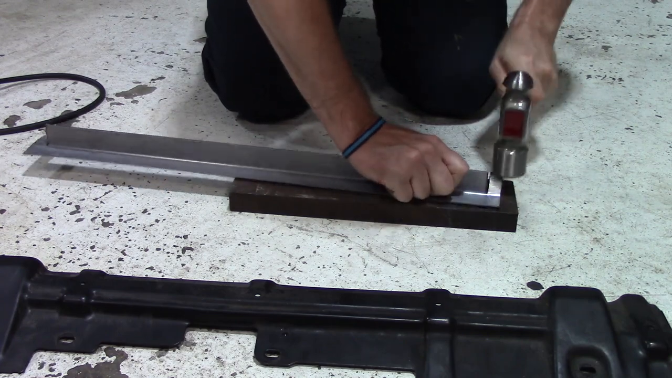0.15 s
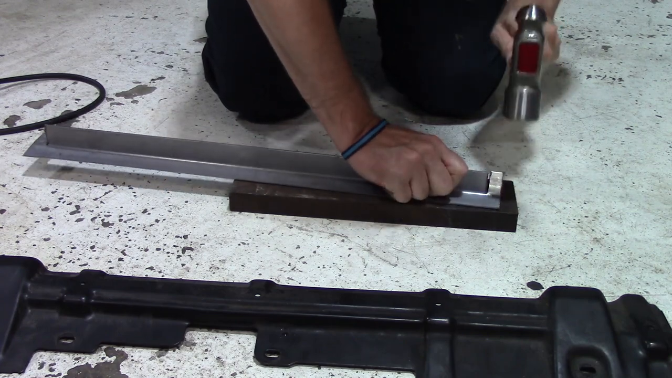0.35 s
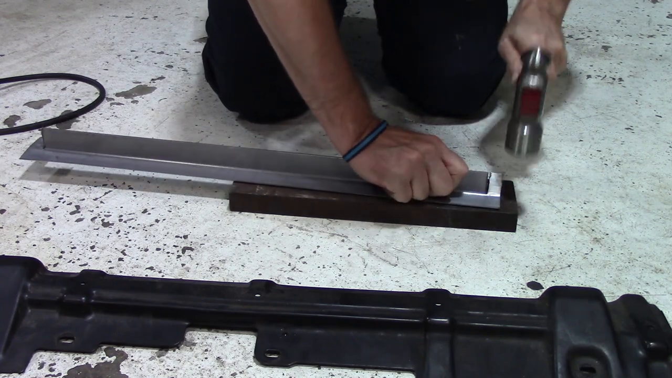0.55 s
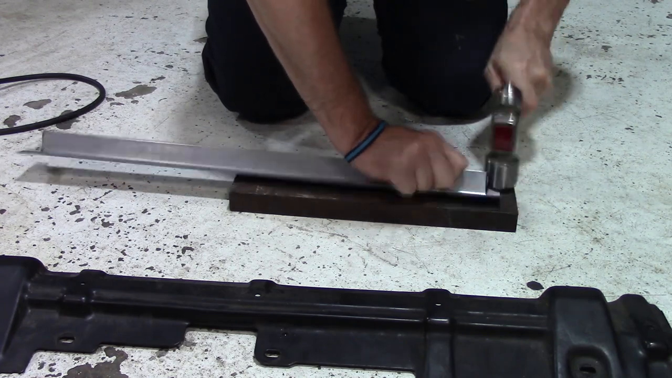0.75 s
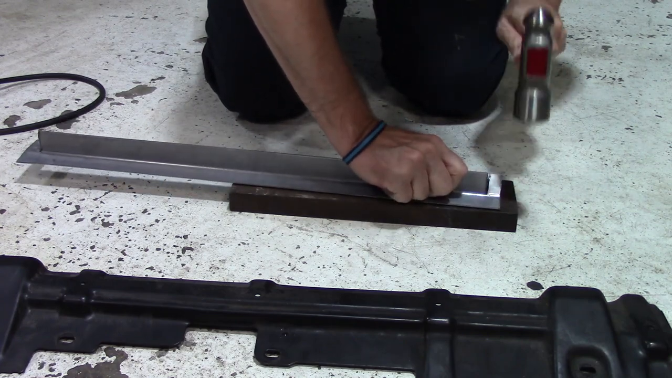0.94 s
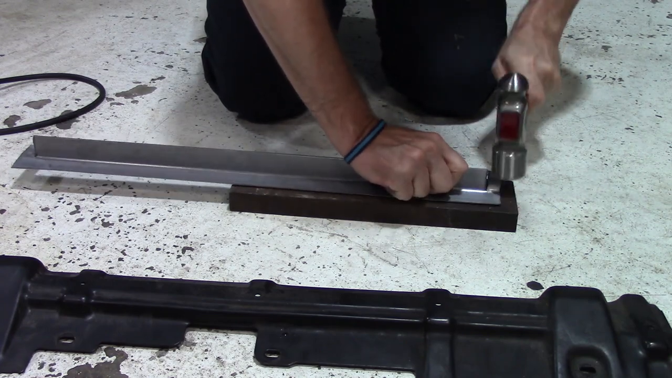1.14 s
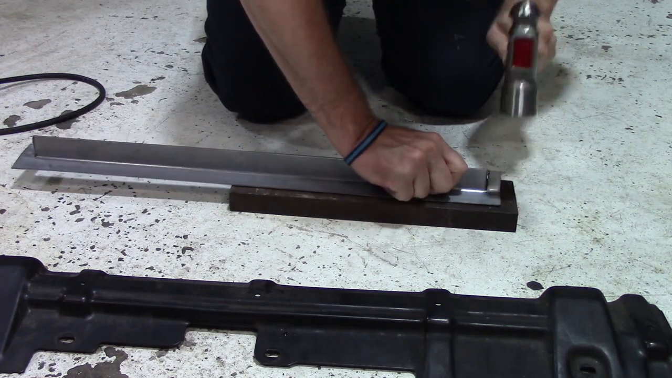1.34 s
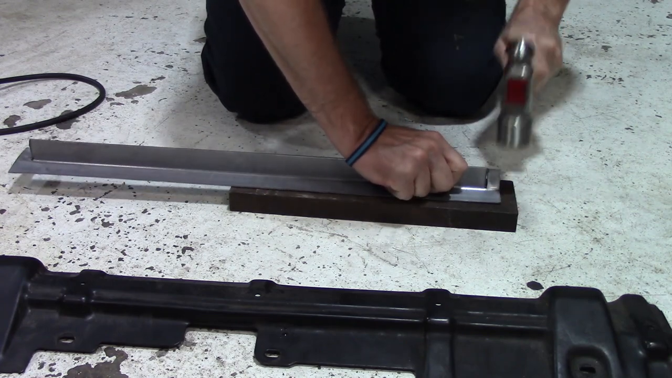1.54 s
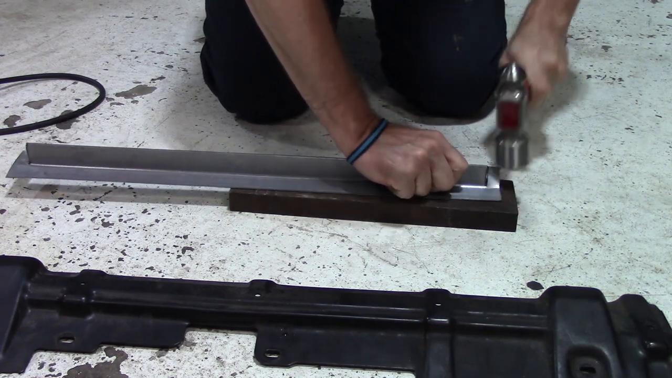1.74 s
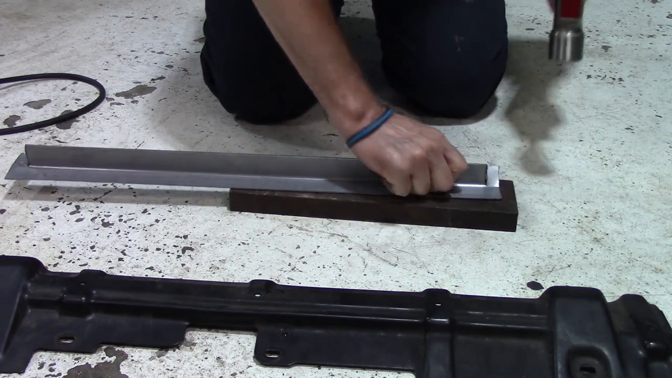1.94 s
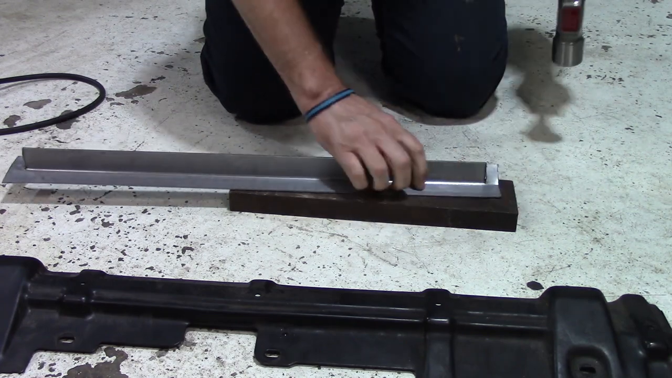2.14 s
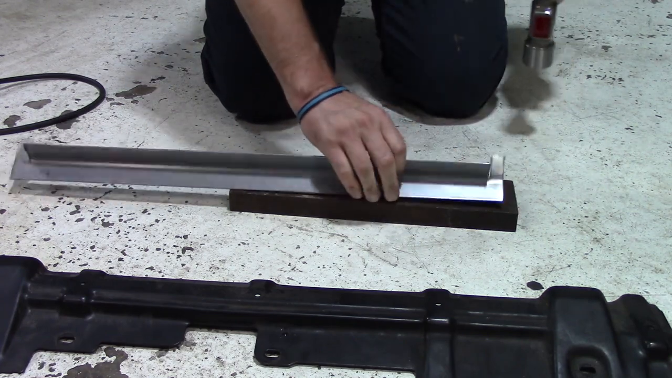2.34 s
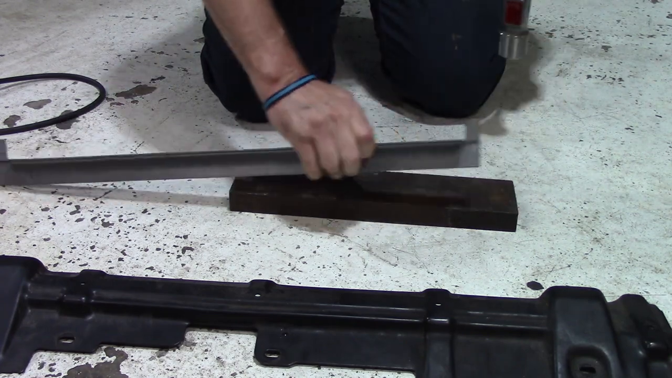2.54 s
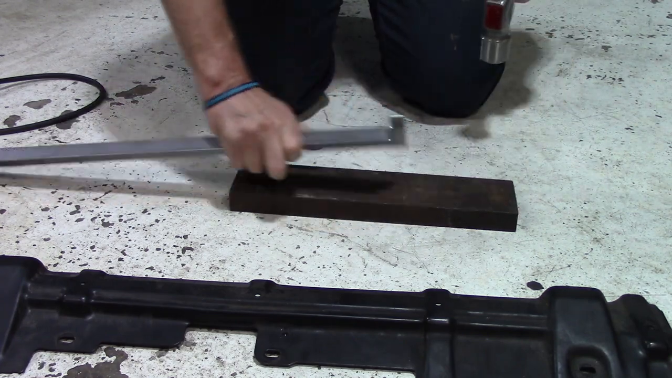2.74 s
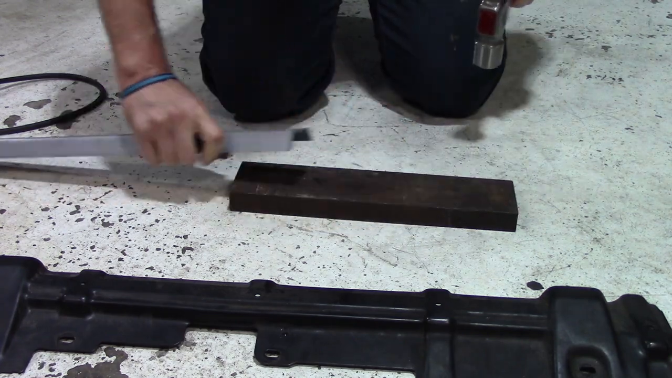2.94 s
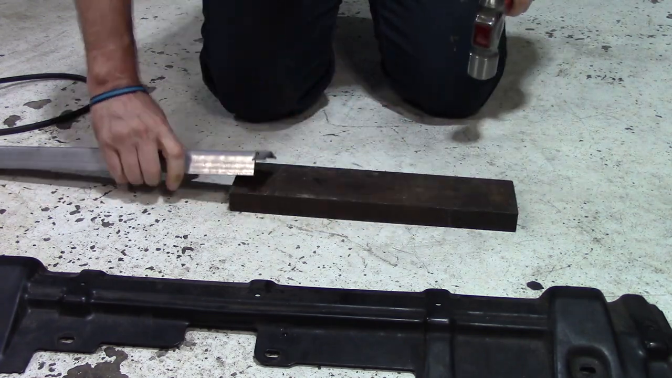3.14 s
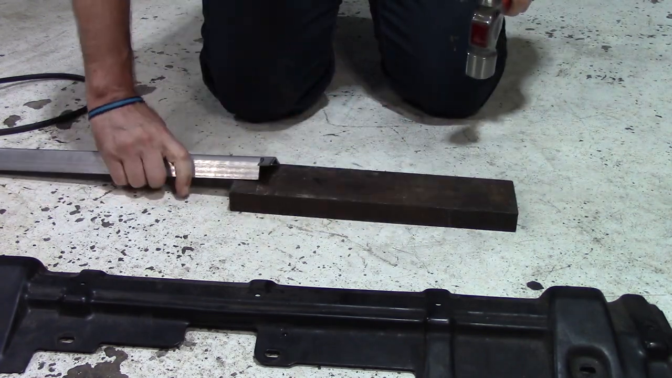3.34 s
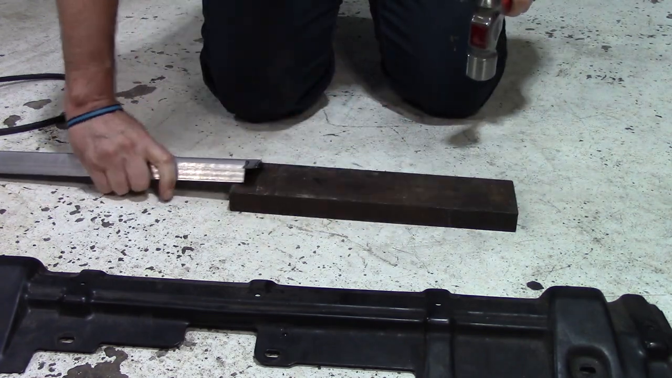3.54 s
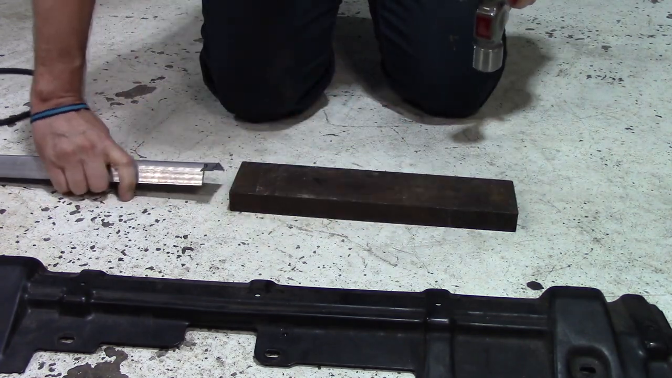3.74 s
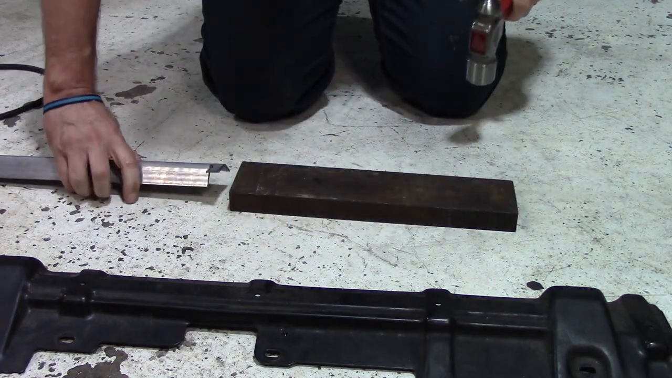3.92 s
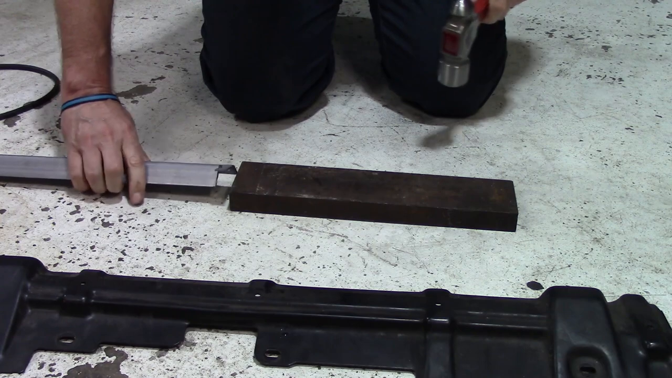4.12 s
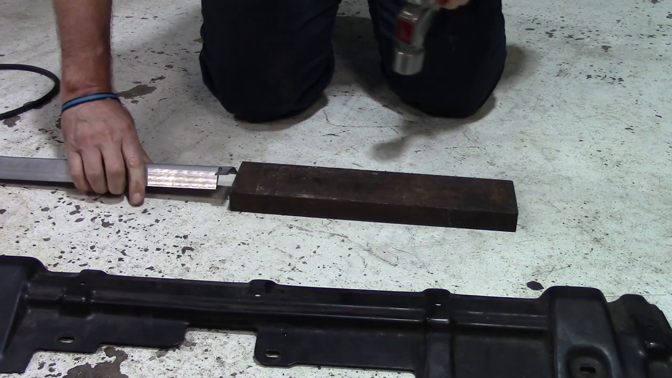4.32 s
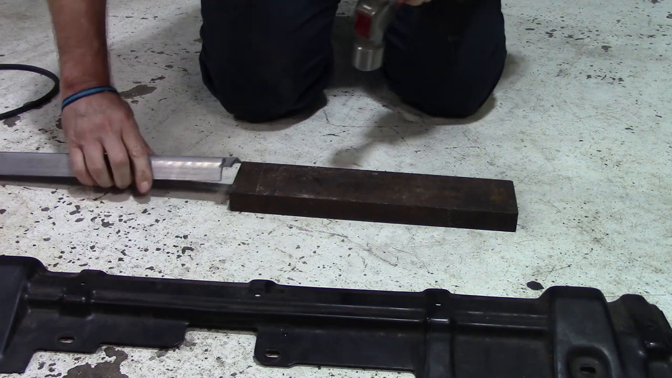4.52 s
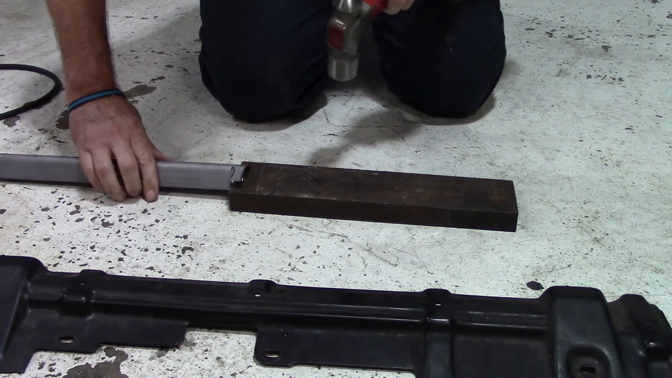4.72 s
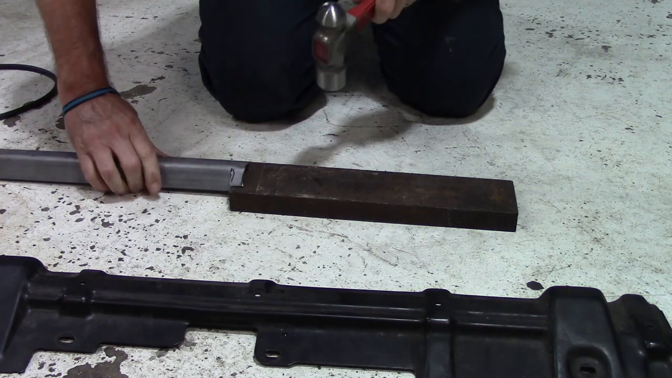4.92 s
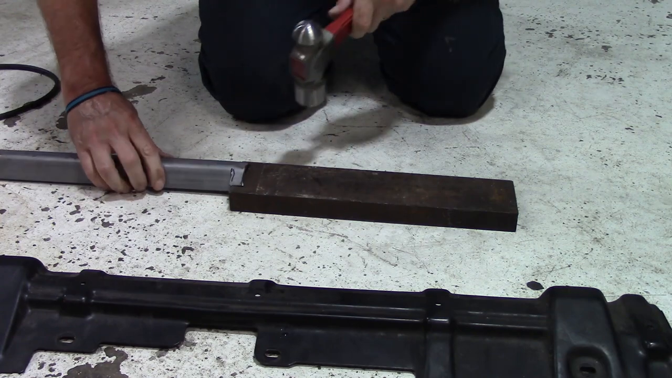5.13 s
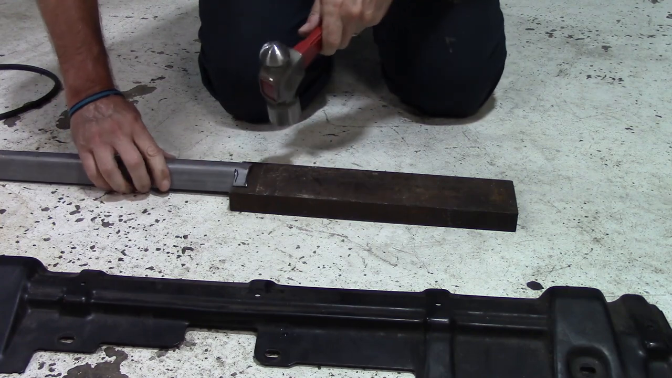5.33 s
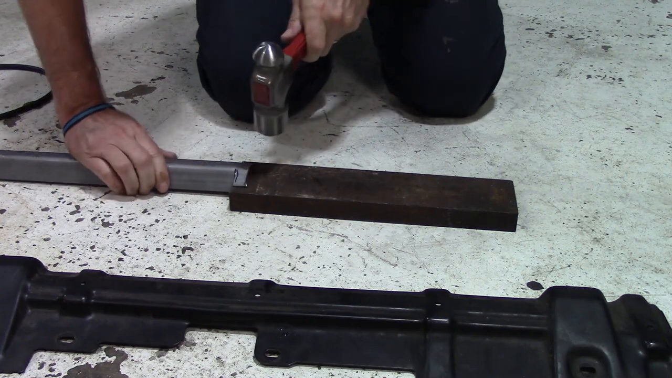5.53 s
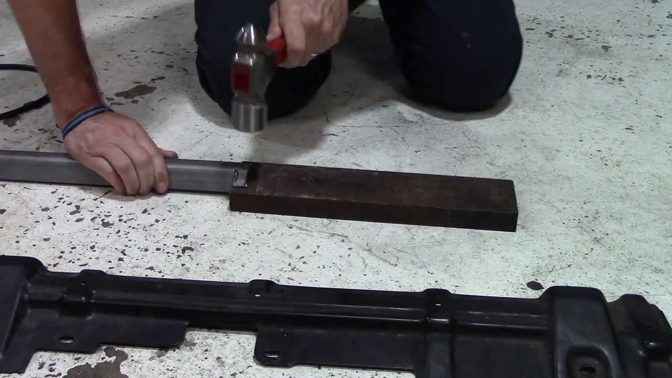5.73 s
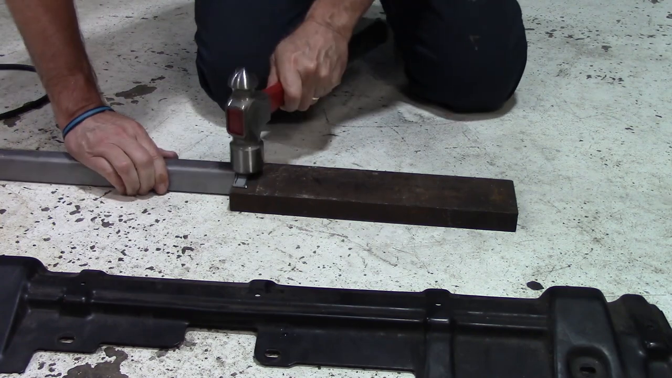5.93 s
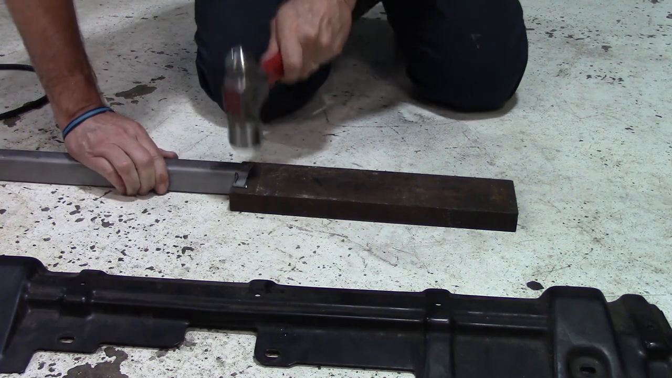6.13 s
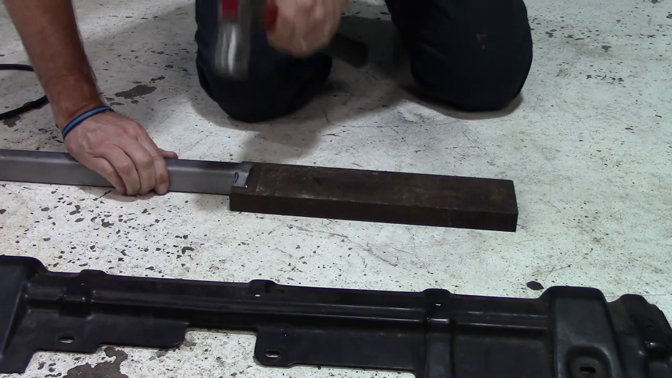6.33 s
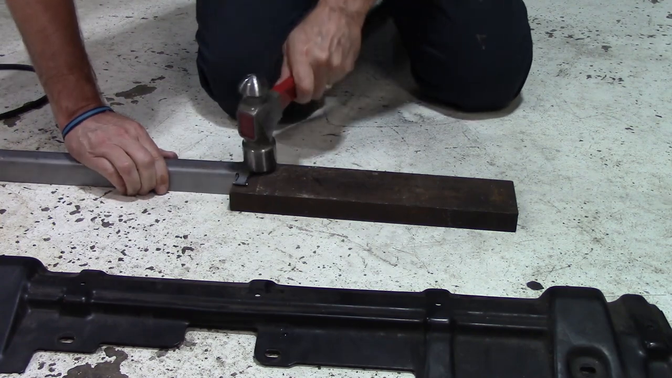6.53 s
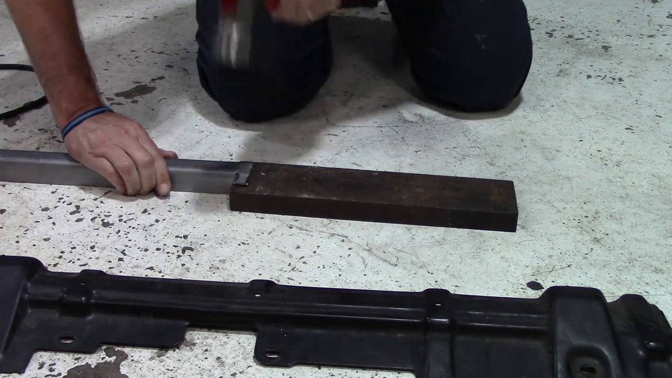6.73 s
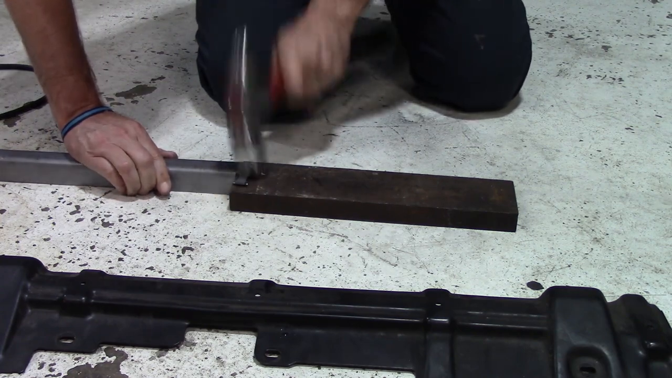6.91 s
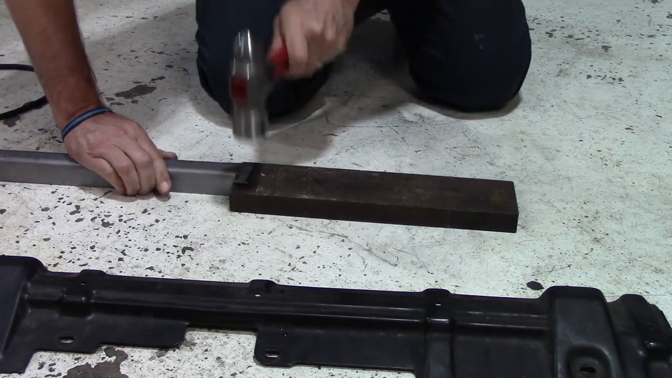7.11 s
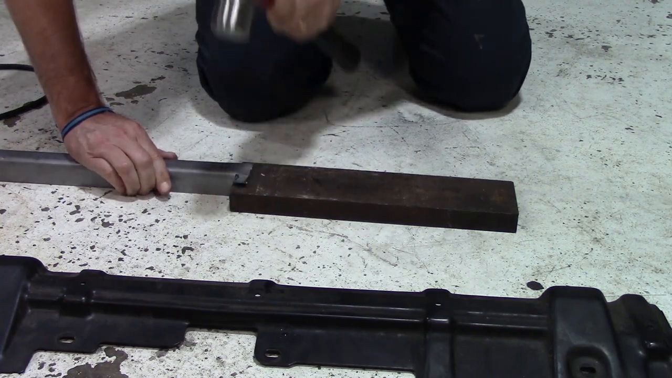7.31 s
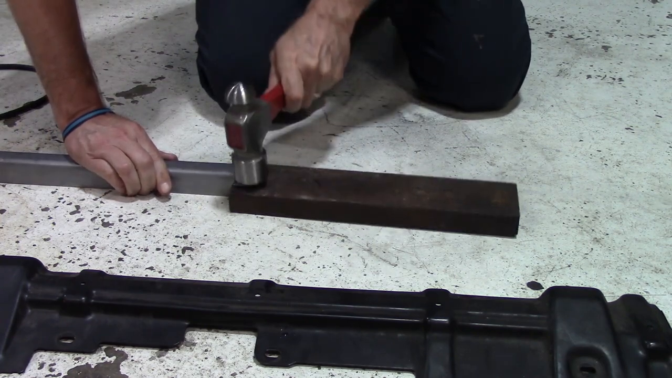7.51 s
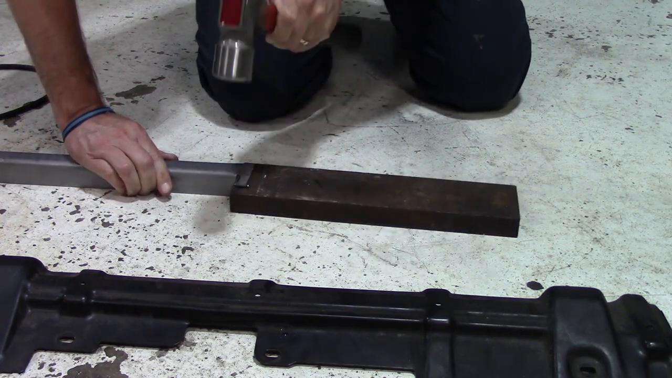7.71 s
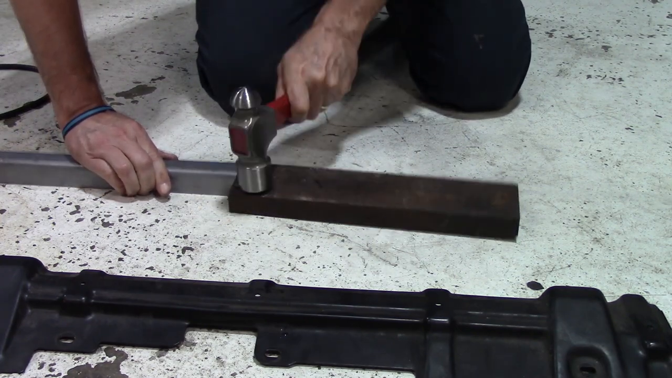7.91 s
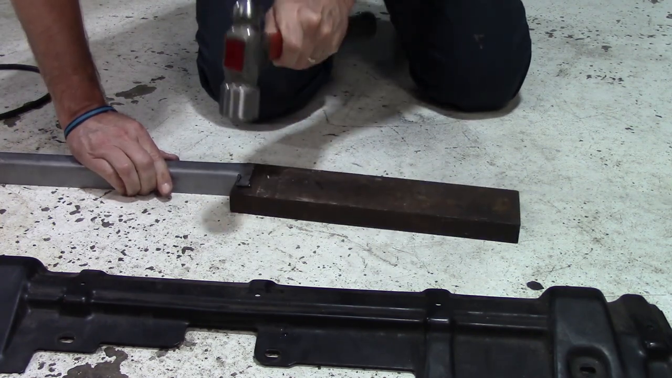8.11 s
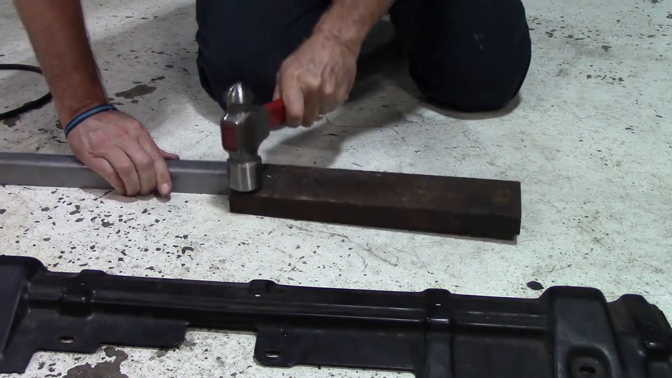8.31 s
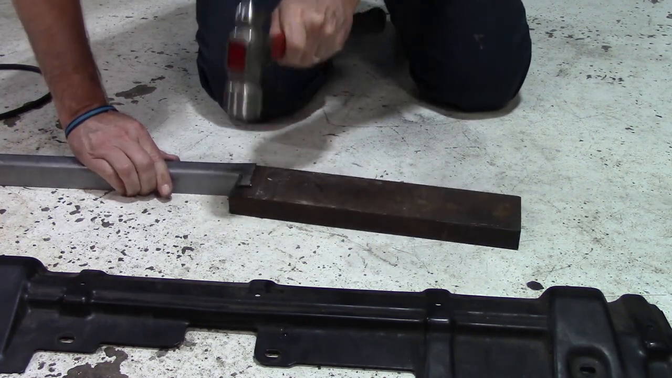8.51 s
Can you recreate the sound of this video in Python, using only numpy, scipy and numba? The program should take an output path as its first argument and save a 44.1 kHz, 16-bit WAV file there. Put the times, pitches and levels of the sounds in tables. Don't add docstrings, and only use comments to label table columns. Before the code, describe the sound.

In an echoing garage, a hammer cracks six times on thin metal, the piece scrapes and clinks over, then six heavy clangs flatten it.

```python
import sys
import numpy as np
from scipy import signal
from scipy.fft import rfft, irfft
from scipy.io import wavfile
from scipy.ndimage import uniform_filter1d
from numba import njit

SR = 44100
rng = np.random.default_rng(int(sys.argv[2]) if len(sys.argv) > 2 else 0)


def magnitude_from_level(level_db):
    exponent = np.asarray(level_db, float) / 20
    return 10 ** exponent


def file_out(sig):
    cols = np.atleast_2d(sig).T
    lim = np.clip(cols, -1, 1)
    pcm = np.round(lim * 32767).astype(np.int16)
    wavfile.write(sys.argv[1], SR, pcm)


N = 381906

# (time [s], strength [dB], tilt [dB/octave], struck spot [Hz], second spot [Hz])
BENDS = [(0.1783, -4.5, 6.5, 5630, 8580), (0.495, -4.5, 4.5, 3900, 11660), (.817, -3, 0.5, 2874, 6110),
         (1.1472, -2.5, 3, 4940, 8900), (1.479, -2.5, 3.5, 6000, 11270), (1.746, -3, 2, 8880, 12200),
         (1.758, 2, 0, 2170, 2870), (1.777, -5.5, 5, 870, 3180), (1.168, -8.5, -2, 3500, 7850),
         (1.492, -4.5, -1, 749, 3235), (1.499, -6, -2.5, 2300, 7270)]
# (frequency [Hz], level [dB])
BEND_COLOUR = [(24, -73.5), (40, -40.5), (219, -13.5), (261, -9), (400, -9.5), (1120, -11.5), (1510, -12.5),
               (1990, -10), (3530, -12.5), (6600, -21), (7480, -20.5), (15900, -25)]
# (frequency [Hz], width [Hz], level [dB])
TAB = [(410, 120, 1.7), (7400, 240, 4.9)]
BEND_SPOT = 72, 5
WALL_HZ, FOLDED_HZ, FOLDED_S = 1475, 1545, 1.05
WALL_WIDTH_HZ, WALL_DB, FOLDED_DB = 45, 13, 3.5
# (time [s], length [ms], level [dB])
FLUTTERS = [
    (0.1759, 8, -14),
    (0.4946, 2.9, -10),
    (0.816, 32, -18.5),
    (1.16, 14.7, -9),
    (1.481, 5, -7.5),
    (1.488, 6.4, -11.5),
    (1.501, 11, -10.5),
    (1.761, 20, -12.5),
]
# (time [s], length [ms], pitch [Hz], level [dB])
SLAPS = [(0.188, 13.4, 410, -10.5), (0.504, 9, 457, -8.5), (1.158, 4.8, 437, 2), (1.492, 9.1, 690, -13.5),
         (4.722, 15, 1250, -27.5), (5.304, 45, 1850, -35.5), (5.325, 39, 1606, -31),
         (5.707, 26, 333, -28.5), (5.726, 18, 476, -32.5), (5.739, 22, 403, -34), (5.76, 26, 310, -32.5),
         (5.786, 14, 450, -36)]
SKID_HZ, SKID_END_HZ, SKID_MS, SKID_DB = 9860, 7650, 1.5, 3.5
SKID_ECHO = 0.085

# (time [s], strength [dB], crack length [ms], tilt [dB/octave], struck spot [Hz])
FLATS = [(5.996, 16.5, 1.2, 6, 8780), (6.0007, 13, 4.7, 0.5, 1742), (6.466, 22, 4.17, 0, 788),
         (6.994, 21.5, 3.47, -1.5, 440), (7.466, 5.5, 3.3, -3, 2520), (7.919, 5, 4.4, -1.5, 1217),
         (8.347, 5.5, 3.3, -1, 1252), (7.133, -5.5, 2.2, 2, 1810), (7.571, 2, 2.0, -2, 2900),
         (7.635, -27.5, 2.7, 7, 7000), (8.008, -7.5, 2.4, -0.5, 1805), (8.437, -11, 4, -1.5, 1730),
         (8.493, -17, 5.1, 0, 1810), (7.582, -11, 3.9, -1, 7520), (7.489, -1, 4, -1.5, 7400),
         (8.021, -10.5, 4, -1.5, 2100)]
# (frequency [Hz], level [dB])
FLAT_COLOUR = [(24, -58), (40, -36), (255, -8), (400, -15), (767, -6), (1010, -11.5), (2140, -2),
               (2310, -2), (4420, -10), (7670, -6), (11200, -7.5), (15900, -18.5)]
# (frequency [Hz], width [Hz], level [dB])
PINCH = [(440, 110, -6.5), (2100, 30, -6.5)]
# (frequency [Hz], width [Hz], level [dB])
LOOSE = [(1335, 730, 8), (7000, 660, -2.5)]
FLAT_SPOT, FLAT_S = (18, 0.67), 6.8

# (frequency [Hz], level [dB], decay t60 [s])
BLOCK = [
    [(1215, 0, .7)],
    [(2765, 0, .7), (2840, -11, .3)],
    [(3215, -3, .5), (3256, 0, .55)],
    [(5599, 0, .6)],
    [(6043, 0, .6)],
    [(8557, 0, .5), (9480, -15, .35), (11700, -17, .35)],
]
# (time [s], low bend level [dB], twist level [dB], upper pair level [dB], head level [dB])
RINGS = [
    (1.758, -45.5, -14.5, -24.5, -47),
    (6.994, 3, -3, 5, -10),
    (7.468, -6.5, -13, 1, -12.5),
    (7.92, -7, -11.5, -13, -12),
    (8.347, -12, -13.5, -10.5, -0.5),
]
LOW_DB = [-49.5, -23.5, -17.5, -19, -20]
PAIR_DB = [-3.5, -3, -8.5, -3.5, -5]
CAUGHT = [0.098, 0.29, .14, 0.15, 0.14]
HEAD_CAUGHT = [.06, .18, .12, 0.21, .075]
KEPT = [.45, .33, 0.9, .22, 0.63, .05]
HEAD_ECHO, STEEL_ECHO_DB = 0.28, -14

# (time [s], level [dB], decay t60 [s])
THUDS = [
    (1.76, -40, 0.4),
    (5.997, -28, 0.46),
    (6.467, -19, 0.49),
    (6.995, -24, .6),
    (7.467, -29, 0.21),
]
# (frequency [Hz], level [dB])
THUD_COLOUR = [(25, -6.5), (60, -3), (110, 8), (200, -17), (500, -60.5)]

# (time [s], peak level [dB], treble share [dB], ring level [dB])
LIFTED = [(2.481, -34.5, 2.5, -7), (2.099, -45, -11, -12), (2.194, -61, -8, -22), (2.414, -48, -3.5, -12),
          (2.488, -19, -9, -11), (2.602, -30, -2.5, -15), (2.739, -37.5, -31, -10),
          (2.791, -34, -23, -13.5), (2.827, -42, -42, -1), (2.965, -33, -9, -10.5), (3.079, -39, -4, -21),
          (3.122, -27, -20, -23.5), (3.155, -49.5, -16.5, -25.5)]
# (time [s], peak level [dB], treble share [dB], ring level [dB])
HELD = [(3.295, -20, -10, -3), (3.546, -27, -21, -34), (3.667, -44, -31, 5), (3.68, -23.5, -9, -6),
        (3.7, -20, -7, -22.5), (3.731, -28.5, -7, -14), (3.753, -19, -8.5, -13.5), (3.858, -38.5, -22, -13),
        (3.999, -44.5, -8, -2), (4.163, -19.5, -11.5, -8.5), (4.171, -29.5, -13, -2), (4.199, -45, -34, -3),
        (4.226, -39, -29.5, 4), (4.479, -30.5, -10, -5.5), (4.504, -23.5, -14, -7),
        (4.707, -21.5, -15, -12), (4.723, -19.5, -23.5, -13), (5.016, -28, 0, -13), (5.076, -32, -29, -28),
        (5.101, -37, -40, -15), (5.297, -23, -25.5, -8.5), (5.674, -37, -26, -28)]
# (frequency [Hz], level [dB])
KNOCK_COLOUR = [(35, -11), (60, -32.5), (388, -7), (619, -10.5), (819, -8.5), (964, -13.5), (1220, -4),
                (1650, -11), (2130, -2.5), (5170, -20.5), (10200, -21.5), (15900, -47.5)]
# (frequency [Hz], width [Hz], level [dB])
TROUGH = [(1950, 47, -4), (1480, 31, -6)]
KNOCK_MS, GRIP_SHIFT = 3.2, 0.027
# (frequency [Hz], level [dB], decay t60 [s])
CHANNEL = [(783, -11, 2.0), (1080, -6, 5.0), (1350, -6.5, 4.6), (1810, -4.5, 3.3), (1960, -6.5, 0.12),
           (2170, -1.5, 0.13), (2320, -10.5, 0.8), (2620, -16, 5.0), (2960, -15, 1.3), (3000, -31, 0.19),
           (3330, -6, 0.4), (3590, -1, 0.08), (3630, -13, 0.056), (3860, -17, 0.39), (4250, -22.5, 0.31),
           (4850, -14, 0.15), (4870, -14, 0.069), (5631, -40.5, 5.0), (5790, -7, 0.1), (6200, -20.5, 0.4),
           (6200, -13, 0.12), (6700, -26, 0.32), (7360, -8, 0.12), (7600, -24.5, 0.41), (7600, -2, 0.041),
           (8080, -24, 0.33), (8450, -2.5, 0.11), (9100, -14.5, 0.14), (10540, -31, 0.32),
           (11200, -24, 0.41)]
# (frequency [Hz], level [dB])
TURNED = [(834.4, -59), (1179, -66), (1351, -56), (1421, -63), (1518, -60), (1825, -55.5), (1960, -61.5),
          (2056, -56.5), (2191, -54), (2390, -63), (2498, -62), (2740, -68), (2875, -64), (3085, -65),
          (3278, -72), (3564, -58), (3833, -72), (4059, -70), (4474, -82), (4861, -66), (5227, -91),
          (5534, -81), (5696, -68), (6175, -64)]
TURNED_S = 2.78
# (frequency [Hz], level [dB], decay t60 [s])
GRIPPED = [(1250, -13.5, .1), (1498, -16, .1), (1850, 5, 0.12), (2010, -3.5, .1), (2092, -1, .1),
           (2240, -13.5, .1), (2300, -25.5, .1), (2650, -16, .1), (2656, -27.5, .1), (3040, -5, .08),
           (3940, -29, .1), (4810, -22, .1), (6000, -12, .1), (6150, -8, .1), (7100, -20.5, .1)]
# (frequency [Hz], level [dB], decay t60 [s])
GRIP_A = [(1210, -18, 1.4), (1464, -23, 5.0), (1965, -16.5, 1.1), (2260, -1, 0.19), (2550, -18, 0.53),
          (2740, -10, 0.33), (3300, -5, 0.038), (4580, -17, 0.077), (4996, -34, 2.4), (5421, -48.5, 5.0),
          (6352, -8, 0.11)]
GRIP_B = [(1195, -21, 0.86), (1637, -6, 0.09), (1965, -23, 5.0), (2020, 2, 0.32), (2120, 5, 0.22),
          (2420, -5, 0.13), (2600, -10, 0.3), (2762, -32, 5.0), (4100, -14, 0.037), (4549, -20, 0.49),
          (5430, -28, 0.9)]
GRIP_C = [(1544, -4, 0.076), (1930, 1.5, 0.26), (2094, 9.5, 0.48), (2207, -7, 0.2), (2930, -4, 0.34),
          (3225, -28.5, 0.18), (4091, -27, 0.27), (4877, -20.5, 0.12), (5400, -34, 5.0), (5669, -14, 0.41),
          (6100, -20, 5.0)]
GRIP_D = [(1290, -6, 5.0), (1500, -2.5, 1.2), (1852, -1.5, 0.15), (2063, 4, 0.55), (2380, -6, 0.49),
          (3950, -32, 5.0), (4540, -28, 5.0), (4850, -25, 0.075), (5534, -28, 0.72), (6200, -18, 0.17),
          (6180, -9, 3.5)]
GRIP_E = [(1040, -15, 0.14), (1249, -25, 5.0), (1464, -21, 0.44), (1863, 0.5, 0.33), (2240, -18, 0.5),
          (2520, -7, 0.12), (2720, -5, 0.025), (3661, -10, 0.039), (4823, -32, 1.4), (5803, -14, 0.1),
          (6783, -34.5, 1.2)]
GRIP_F = [(1226, -7.5, 0.34), (2050, 3, 0.3), (2600, -20, 0.26), (2955, -1, 0.16), (3460, 2, 0.037),
          (3941, -5, 5.0), (4800, -22.5, 0.13), (4900, -11.5, 0.13), (5566, -37, 5.0), (5954, -0.5, 0.21),
          (6901, -17.5, 0.36)]
GRIP_G = [(1061, -27, 5.0), (1330, -12, 3.3), (1755, -9.5, 0.093), (1860, -8.5, 0.82), (2140, -2, 0.08),
          (2568, -12, 0.2), (2700, -4, 0.23), (3330, -17, 0.33), (3731, -8, 0.073), (4990, -33, 0.42),
          (6072, -12, 0.11)]
REGRIP_S = [3.5, 3.95, 4.4, 4.65, 4.9, 5.2]

# (start [s], end [s], level [dB])
SLIDE = [
    (2.637, 2.76, -57.5),
    (2.815, 3.072, -51.5),
    (3.1, 3.4, -69),
    (3.571, 3.66, -38.5),
    (4.03, 4.4, -59.5),
    (4.514, 4.577, -42.5),
    (5.24, 5.7, -51.5),
]
PUSH_DB_PER_S, EASE_DB_PER_S = 123, 89.5
# (time [s], length [s], level [dB])
RUSTLES = [(0, 0.041, -58.5), (2.163, 0.06, -68.5), (2.283, .1, -65.5), (2.944, 0.17, -61.5),
           (3.508, 0.13, -48.5), (3.644, 0.11, -37), (3.839, 0.048, -50.5), (4.387, 0.06, -62),
           (4.456, 0.071, -50.5), (5.228, 0.078, -58), (5.621, 0.12, -50), (5.733, 0.049, -56.5),
           (5.768, 0.038, -51.5)]
# (frequency [Hz], level [dB])
RUSTLE_COLOUR = [(1470, -39.5), (2500, -2), (4460, -2.5), (5810, -2), (7320, -2), (10500, -1.5),
                 (15900, -17.5)]

# (frequency [Hz], level [dB])
HUSH_COLOUR = [(15, -44.5), (25, -7), (113, -3), (325, -1), (514, -4.5), (730, -5), (1190, -11.5),
               (1400, -5.5), (3310, -21.5), (9240, -26.5), (13500, -31.5), (15900, -55)]
OPEN_DB, DUCK_S, DUCKED_DB, TOP_DB, TRIM_DB = -68, 0.13, -80, -67.5, -3.5
CREEP_FROM_S, CREEP_DB_PER_S, HUSH_SIDE_DB = 0.93, 2.5, -11
# (frequency [Hz], decay t60 [s])
GARAGE = [(100, 0.18), (300, 0.7), (1000, 0.57), (3000, 0.59), (7000, 0.54), (14000, 0.28)]
# (frequency [Hz], side against mid [dB])
WIDTH = [(60, -27.5), (180, -22), (550, -28.5), (1650, -18), (4970, -7), (15000, -6)]


def evened(x):
    return x / np.sqrt(np.mean(x ** 2) + 1e-20)


def read(points, hz):
    f, value = np.transpose(points)
    return np.interp(np.log(hz + 1), np.log(f + 1), value)


def add(mix, s, sound):
    part = mix[round(s * SR):][:len(sound)]
    part += sound[:len(part)]


def causal(points, tilt_db=0., peaks=(), size=2048):
    hz = abs(np.fft.fftfreq(size, 1 / SR))
    db = read(points, hz) + np.clip(tilt_db, -4, 6) * np.log2((hz + 200) / 2000)
    for peak_hz, width_hz, peak_db in peaks:
        height_db = max(7 + .5 * peak_db, 0)
        db += height_db / (1 + ((hz - peak_hz) / (.024 * peak_hz + width_hz)) ** 2)
    log = np.log(magnitude_from_level(np.maximum(db, -100)))
    phase = -signal.hilbert(log).imag
    taps = np.fft.ifft(np.exp(log + 1j * phase)).real[:size // 2]
    return taps / np.linalg.norm(taps)


def coloured(x, points):
    return signal.oaconvolve(x, causal(points))[:len(x)]


def modes(rows, seconds, longest=0.52, scatter_db=0.):
    hz, db, t60 = np.transpose(rows)[:, :, None]
    t = np.arange(int(seconds * SR)) / SR
    luck = rng.random((2, len(hz), 1))
    level_db = db + scatter_db * (2 * luck[0] - 1) - 60 * t / np.minimum(t60, longest)
    return (magnitude_from_level(level_db) * np.sin(2 * np.pi * (hz * t + 0.3 * luck[1]))).sum(0)


def crack(ms, tilt_db, colour, peaks=(), rise_s=0.00047):
    t = np.arange(4096) / SR
    rattle = 0.053 * np.exp(-t / 0.024)
    shape = (1 - np.exp(-t / rise_s)) * (np.exp(-t / (ms / 1000)) + rattle)
    z = rfft(rng.standard_normal(len(t)) * shape)
    burst = irfft(z / uniform_filter1d(abs(z), size=9)) * (t < .06)
    burst *= np.linalg.norm(shape) / np.linalg.norm(burst)
    return signal.oaconvolve(burst, causal(colour, tilt_db, peaks))[:len(t)]


def flats():
    out = np.zeros(N)
    for s, db, ms, tilt_db, spot_hz in FLATS:
        rings = PINCH + LOOSE * (s < FLAT_S) + [(spot_hz, *FLAT_SPOT)]
        add(out, s, magnitude_from_level(db) * crack(ms, tilt_db, FLAT_COLOUR, rings))
    return out


def wall_hz(s):
    return WALL_HZ if s < FOLDED_S else FOLDED_HZ


def bends():
    out = np.zeros(N)
    for s, db, tilt_db, *spots_hz in BENDS:
        wall = (wall_hz(s), WALL_WIDTH_HZ, WALL_DB - FOLDED_DB * (s < FOLDED_S))
        spots = [(hz, *BEND_SPOT) for hz in spots_hz]
        add(out, s, magnitude_from_level(db) * crack(2.8, tilt_db, BEND_COLOUR, TAB + [wall] + spots))
    return out


def skids():
    out, ms = np.zeros(N), np.arange(600) * 1000 / SR
    fade = np.exp(-ms / SKID_MS)
    hz = SKID_END_HZ + (SKID_HZ - SKID_END_HZ) * fade
    squeal = np.minimum(ms / 0.81, 1) * fade * np.sin(2 * np.pi * np.cumsum(hz) / SR)
    for s, db, *_ in BENDS[:6]:
        add(out, s, magnitude_from_level(db + SKID_DB) * squeal)
    return out


def wavering(hz, shape):
    noise = uniform_filter1d(rng.standard_normal(2000), size=60)[:len(shape)]
    return shape * np.sin(2 * np.pi * np.cumsum(hz * (1 + .15 * noise)) / SR)


def flutters():
    out = np.zeros(N)
    for s, ms, db in FLUTTERS:
        swell = signal.windows.tukey(int(ms * SR / 1000), .6)
        add(out, s, magnitude_from_level(db) * wavering(wall_hz(s), swell))
    return out


def slaps():
    out = np.zeros(N)
    for s, ms, hz, db in SLAPS:
        count = int(ms * SR / 1000)
        u = np.arange(count) / count
        add(out, s, magnitude_from_level(db) * wavering(hz, np.minimum(u * ms, 1) * (1 - u) ** 3.5))
    return out


def block():
    steel, head, t = np.zeros(N), np.zeros(N), np.arange(SR // 2) / SR
    blows = zip(RINGS, LOW_DB, PAIR_DB, CAUGHT, HEAD_CAUGHT)
    for (s, bend_db, twist_db, pair_db, head_db), low_db, under_db, caught, head_caught in blows:
        level_db = low_db, bend_db, twist_db, pair_db, pair_db + under_db, head_db
        for db, family, kept in zip(level_db, BLOCK, KEPT):
            drift = signal.oaconvolve(rng.standard_normal(len(t)), np.hanning(800), "same")
            waver_db = 3.5 * evened(drift)
            is_head = family is BLOCK[-1]
            since_caught = np.maximum(t - (head_caught if is_head else caught), 0)
            choke = kept + (1 - kept) * np.exp(-since_caught / 0.01)
            ring = magnitude_from_level(db + waver_db) * choke * modes(family, .5, 1)
            add(head if is_head else steel, s, ring)
    return steel, head


def thuds():
    out, t = np.zeros(N), np.arange(SR // 2) / SR
    for s, db, t60 in THUDS:
        noise = rng.standard_normal(2 * len(t))
        rumble = signal.oaconvolve(noise, causal(THUD_COLOUR, size=8192))[len(t):2 * len(t)]
        add(out, s, magnitude_from_level(db - 60 * t / t60) * np.minimum(t / .01, 1) * evened(rumble))
    return out


def body_at(s):
    if s < TURNED_S:
        return CHANNEL
    if s < HELD[0][0]:
        top_db = max(db for hz, db in TURNED)
        return [(hz, db - top_db, .3) for hz, db in TURNED]
    grips = [GRIP_A, GRIP_B, GRIP_C, GRIP_D, GRIP_E, GRIP_F, GRIP_G]
    return grips[np.searchsorted(REGRIP_S, s)]


def dulled(body, tilt_db):
    return [(hz, db + tilt_db * max(np.log2(hz / 2200), 0), t60) for hz, db, t60 in body]


def knocks(rows, longest, detune):
    out = np.zeros(N)
    for s, db, treble_db, ring_db in rows:
        tilt_db = 0.34 * (treble_db + 18.5)
        grip = np.sin(7 * s)
        trough = [(hz * (1 + GRIP_SHIFT * grip), width, d) for hz, width, d in TROUGH]
        body = [(hz * (1 + detune * np.sin(11 * s + hz / 90)), d, t60) for hz, d, t60 in body_at(s)]
        tick = crack(KNOCK_MS, tilt_db, KNOCK_COLOUR, trough, rise_s=0.0025)
        ring = modes(dulled(body, tilt_db - 5.0), .3, longest, scatter_db=-1.5)
        add(out, s, magnitude_from_level(db + 3.0) * tick)
        add(out, s, magnitude_from_level(db + ring_db) * ring)
    return out


def boom():
    out = np.zeros(N)
    add(out, 2.489, modes([(307, -39, .4)], 0.28))
    return out


def slide():
    t = np.arange(N) / SR
    size = magnitude_from_level(2.0 * np.minimum(rng.exponential(1, N), 3))
    grit = size * rng.choice([-1, 1], N) * (rng.random(N) < .08)
    start, end, db = np.transpose(SLIDE)[:, :, None]
    stroke_db = db - PUSH_DB_PER_S * np.maximum(start - t, 0) - EASE_DB_PER_S * np.maximum(t - end, 0)
    drive = grit / grit.std() * magnitude_from_level(stroke_db.max(0))
    scrape = magnitude_from_level(-9.0) * coloured(drive, KNOCK_COLOUR)
    place = (t / .09).astype(int) % 3
    free = body_at(TURNED_S), .16, t < 3.2, 1.5
    gripped = GRIPPED, .06, t >= 3.2, -15
    for k in range(3):
        for body, longest, when, ring_db in (free, gripped):
            ring = modes(dulled(body, -4), .3, longest, scatter_db=5)
            ring /= np.linalg.norm(ring)
            scrape += magnitude_from_level(ring_db) * signal.oaconvolve(drive * when * (place == k), ring)[:N]
    return scrape


def rustle():
    swell = np.zeros(N)
    for s, length, db in RUSTLES:
        add(swell, s, magnitude_from_level(db + 1.5) * np.hanning(int(length * SR)))
    fibres = magnitude_from_level(2.0 * rng.exponential(1, N)) * rng.standard_normal(N)
    return swell * evened(coloured(fibres, RUSTLE_COLOUR))


def hush():
    t = np.arange(N) / SR
    level_db = np.clip(DUCKED_DB + CREEP_DB_PER_S * (t - CREEP_FROM_S), DUCKED_DB, TOP_DB)
    level_db += TRIM_DB * (t > FLATS[0][0])
    level_db += (OPEN_DB - DUCKED_DB) * np.maximum(1 - t / DUCK_S, 0)
    mid, side = (evened(coloured(z, HUSH_COLOUR)) for z in rng.standard_normal((2, N)))
    return magnitude_from_level(level_db + 16.0) * (mid + magnitude_from_level(HUSH_SIDE_DB) * np.outer([1, -1], side))


def garage(x, wet_db):
    hz, t, z = signal.stft(rng.standard_normal((2, SR)), SR, nperseg=256)
    z = z * magnitude_from_level(-60 * t / read(GARAGE, hz)[:, None])
    z[1] *= magnitude_from_level(read(WIDTH, hz) - 6.5)[:, None]
    tail = signal.istft(z, SR, nperseg=256)[1]
    tail *= np.clip((np.arange(tail.shape[1]) / SR - .004) / 0.0012, 0, 1)
    tail /= np.linalg.norm(tail[0])
    mid, side = magnitude_from_level(wet_db) * signal.fftconvolve(x[None], tail, axes=1)[:, :N]
    return np.array([x + mid + side, x + mid - side])


def scene():
    squeal = skids()
    side = garage(bends() + flutters() + slaps() + SKID_ECHO * squeal, -6.0) + (1 - SKID_ECHO) * squeal
    flat = garage(flats(), -3.5)
    ring, head = block()
    steel = garage(ring + HEAD_ECHO * head, STEEL_ECHO_DB) + (1 - HEAD_ECHO) * head
    handling = knocks(LIFTED, .3, .006) + knocks(HELD, .06, .012)
    handling += boom() + slide() + rustle()
    return side + flat + steel + garage(handling, -3.5) + thuds() + hush()


@njit
def follow(power, rise, fall):
    out, level = np.empty_like(power), 0.
    for i in range(len(power)):
        level += (rise if power[i] > level else fall) * (power[i] - level)
        out[i] = level
    return out


def top_cut(x):
    return signal.sosfilt(signal.butter(12, 16010, fs=SR, output="sos"), x)


def record(dry):
    heard = signal.sosfilt(signal.butter(2, 90, "high", fs=SR, output="sos"), dry)
    power = follow((heard ** 2).mean(0), 1 / (0.0072 * SR), 1 / (0.02 * SR))
    level_db = 10 * np.log10(power + 1e-12)
    heard = signal.sosfilt(signal.butter(4, 15300, fs=SR, output="sos"), heard)
    held = heard / magnitude_from_level(0.94 * np.maximum(level_db + 6.5, 0))
    finished = np.tanh(held ** 3 / 3 + held) * 0.83
    return top_cut(finished)


dry = scene()
out = record(dry)
file_out(out)
```